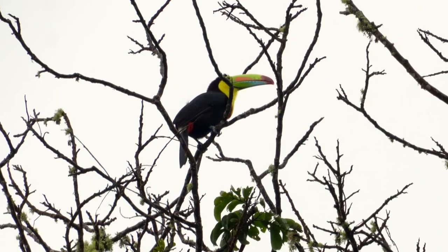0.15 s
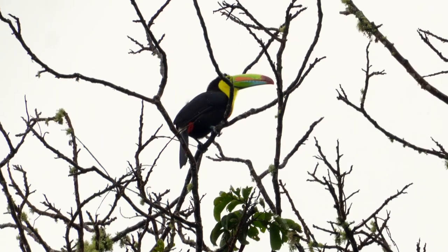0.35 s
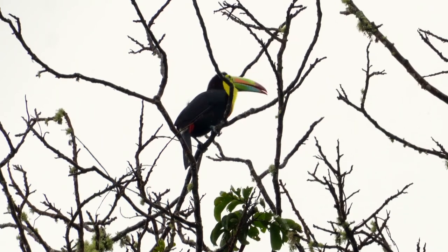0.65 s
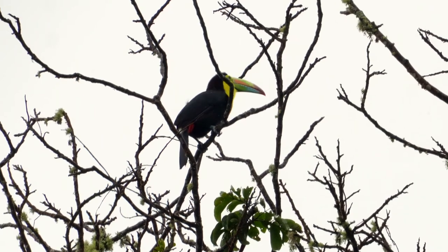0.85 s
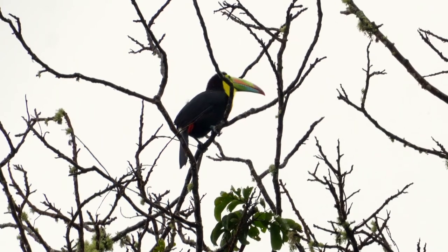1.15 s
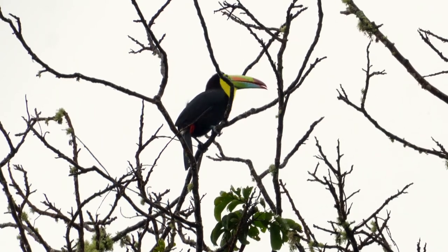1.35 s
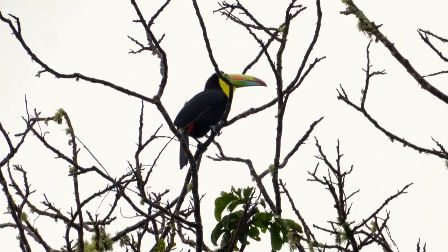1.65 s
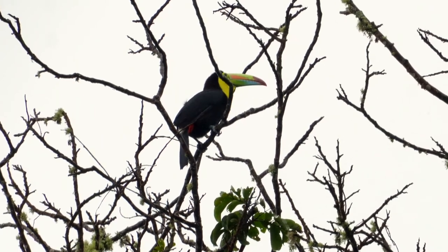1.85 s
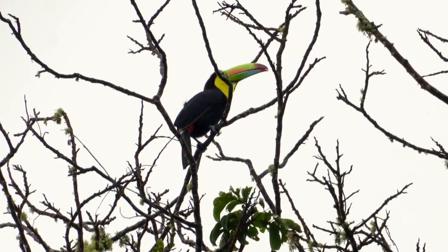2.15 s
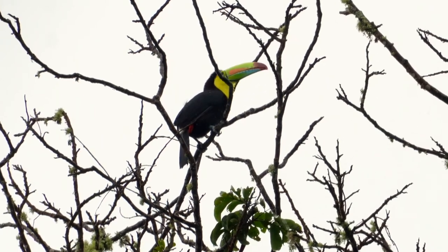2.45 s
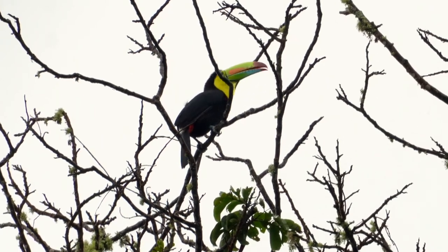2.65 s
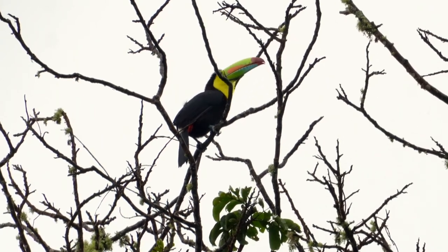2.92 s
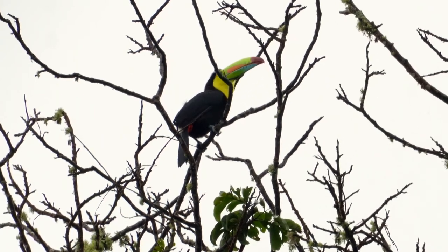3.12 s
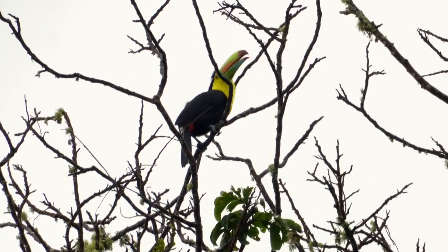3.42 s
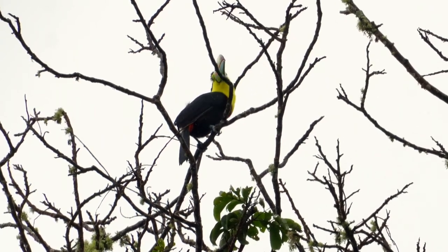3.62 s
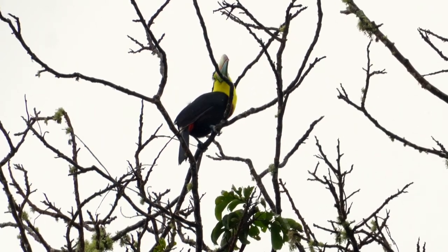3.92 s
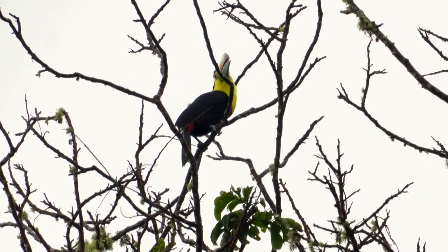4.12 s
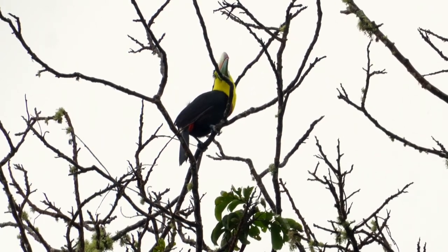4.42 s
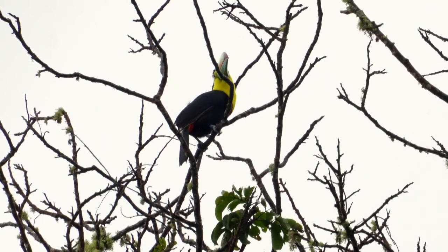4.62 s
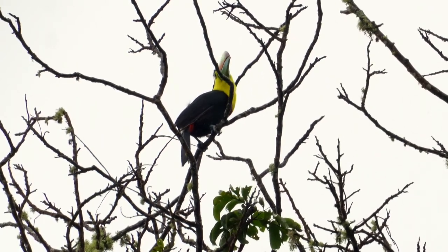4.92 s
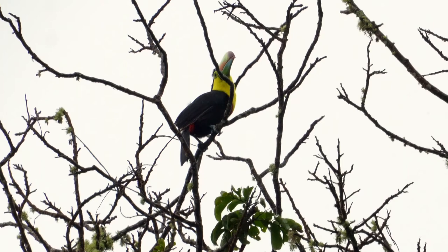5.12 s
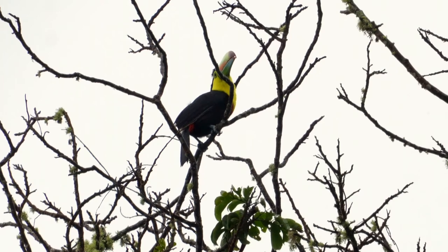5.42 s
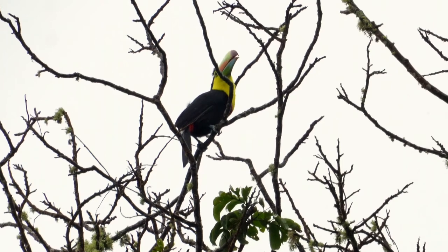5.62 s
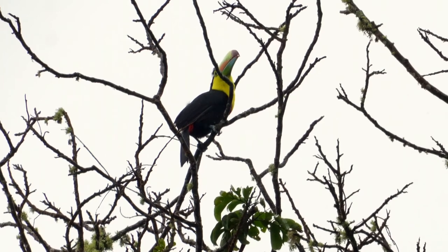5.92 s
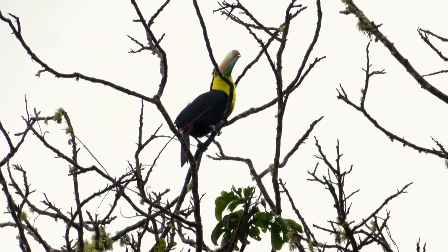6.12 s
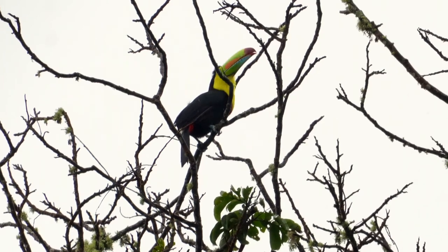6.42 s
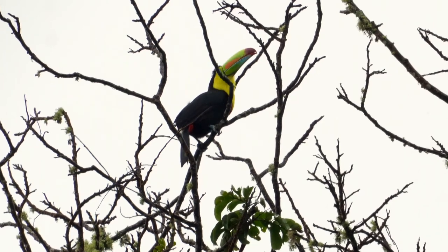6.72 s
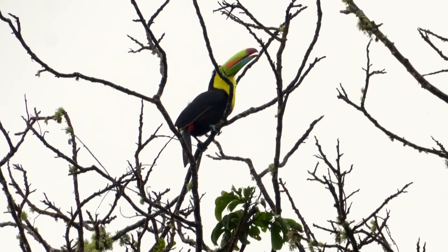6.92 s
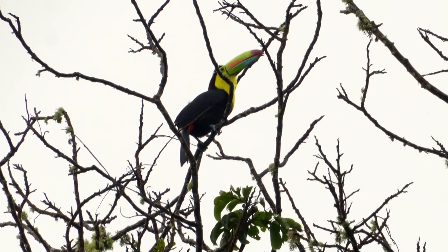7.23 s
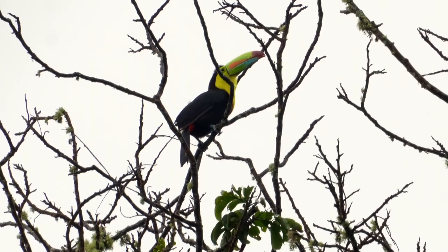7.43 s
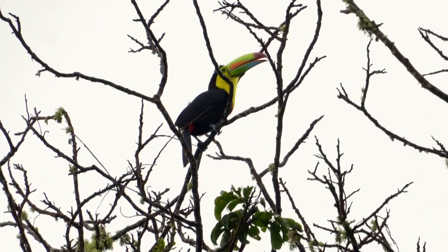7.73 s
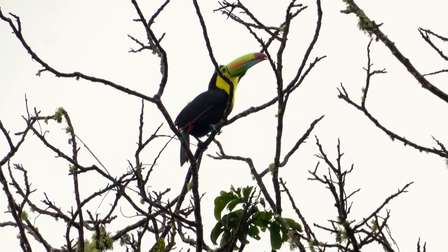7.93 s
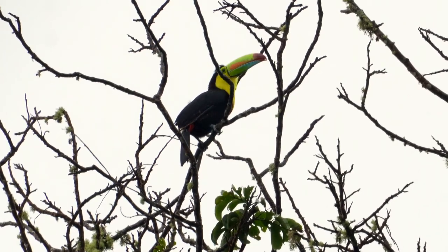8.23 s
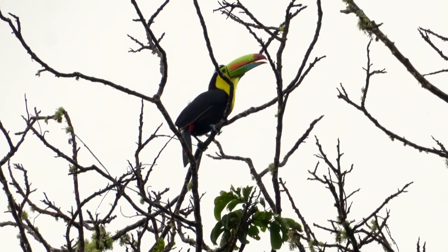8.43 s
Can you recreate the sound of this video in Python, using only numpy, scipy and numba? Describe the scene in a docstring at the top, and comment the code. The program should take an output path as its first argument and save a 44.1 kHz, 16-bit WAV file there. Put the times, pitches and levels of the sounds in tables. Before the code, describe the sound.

Bright, throbbing frog peeps around 4 kHz run about four per second, two voices overlapping at first, one alone in the middle, then two again. Below them a toucan gives regular, grating croaks with a nasal upward bend, loudest at the opening and midway. Flickering rain hiss lies quietly beneath, with crisp leaf drips, brief insect buzzes and muffled rustles. Open wet forest, wide stereo, animals at a distance with short leafy reverberation.

```python
"""A toucan croaks from a far treetop in a wet forest: uneven pulses ring two rising resonances.
Three small frogs pipe rising, throbbing notes, one of them fainter; trunks and leaves echo every caller.
Drops from the canopy burst on leaves as short sprays of band-limited noise, over a soft, flickering rain hiss.
Now and then an insect buzzes (noise in a sliding resonance) or a dull thud or rustle swells up."""
import sys
import numpy as np
from scipy import signal
from scipy.fft import rfft, irfft
from scipy.io import wavfile
from scipy.ndimage import uniform_filter1d
from numba import njit

SR = 44100
rng = np.random.default_rng(int(sys.argv[2]) if len(sys.argv) > 2 else 0)


def persist_wave(psi):
    """Save psi, clipped to +-1, as 16-bit WAV."""
    counts = np.round(np.clip(psi, -1, 1) * 32767).astype(np.int16)
    wavfile.write(sys.argv[1], SR, np.atleast_2d(counts).T)


N = 377496  # length in samples

# rain colour: f/Hz, level per Hz/dB
RAIN_COLOUR = [(20, -40), (60, -35), (115, -23.5), (166, -16.5), (400, -4), (660, 1.5), (1500, 0.5),
               (3600, -8), (6400, -11.5), (11600, -21), (16000, -26)]
# how wide the rain spreads: f/Hz, side minus mid/dB
RAIN_SPREAD = [(30, -3), (85, -12), (125, -33), (300, -14.5), (700, -8), (2000, 0.5), (8000, 0)]
RAIN_DB = -42

# notes of each frog: t/s, level/dB, starting f/Hz before its waver
LOW_FROG_NOTES = [(.0376, -14, 4023), (.27, -15.5, 4055), (.513, -14, 4034), (.7465, -11.5, 4056),
                  (.985, -14, 4020), (1.2254, -13.5, 4035), (1.459, -15.5, 4026), (1.7637, -17.5, 4064),
                  (2.068, -18, 3995), (2.306, -16, 3984), (2.5533, -14.5, 4035), (2.792, -14.5, 4044),
                  (3.044, -13, 4007), (3.289, -14.5, 4040), (3.548, -12, 4022), (3.788, -12.5, 4016),
                  (4.0495, -13.5, 4037), (4.304, -15.5, 4035), (4.5467, -12.5, 4033), (4.797, -14.5, 4022),
                  (5.122, -12, 4025), (5.4375, -13.5, 4008), (5.782, -14.5, 4023), (6.132, -17, 3975),
                  (6.509, -12, 3960)]
HIGH_FROG_NOTES = [(.078, -10, 4230), (.313, -7.5, 4196), (.557, -6, 4184), (.822, -11.5, 4194),
                   (1.068, -13, 4270), (1.2986, -13, 4220), (1.659, -12, 4330), (1.968, -14.5, 4270),
                   (2.283, -10.5, 4195), (6.319, -14.5, 4144), (6.573, -11.5, 4170), (6.791, -12, 4287),
                   (7.0335, -9.5, 4270), (7.2515, -12, 4240), (7.486, -12, 4280), (7.759, -10.5, 4244),
                   (8.0356, -11.5, 4240), (8.257, -12, 4240), (8.4864, -12.5, 4210)]
FAR_FROG_NOTES = [(2.99, -25.5, 3980), (3.659, -26, 3980), (4.998, -33, 3980), (5.345, -30.5, 4060),
                  (5.645, -34.5, 4060), (5.99, -29, 4230), (7.212, -20, 3994), (7.927, -26, 3950)]
# direct sound and echoes of each caller: delay t/s, left level/dB, right level/dB
LOW_FROG_PATHS = [(0, 2, -6), (0.01, -14, -20), (0.017, -6.5, -5), (0.049, -12.5, -27)]
HIGH_FROG_PATHS = [(0, 0, -14), (.009, -11, -16), (.024, -18, -16), (.045, -16, -15), (.062, -22, -20)]
FAR_FROG_PATHS = [(0, -9, -12), (.021, -9, -9)]
TOUCAN_PATHS = [(0, 0, 0), (.008, -5, -4), (.021, -7, -6)]
LOW_TAIL_DB, HIGH_TAIL_DB, FAR_TAIL_DB, TOUCAN_TAIL_DB = -3, -13, .27, -0.5  # leaf scatter
EAR_LAG = 4  # samples

# drops bursting on leaves: t/s, level/dB, main band f/Hz, second band f/Hz, left minus right/dB
LEAF_DROPS = [(0.031, -34.5, 7160, 9400, -12), (0.179, -38, 14700, 5640, -1), (0.497, -27, 14700, 12900, 1),
              (1.153, -33.5, 9700, 14900, 2), (1.468, -29, 11400, 9600, 8), (2.637, -38, 15200, 9100, 1),
              (2.844, -34.5, 14400, 11450, -3), (3.776, -35.5, 9700, 14850, -9),
              (3.899, -37, 11000, 14850, 6), (3.958, -30, 15030, 13300, -1), (4.333, -22, 8700, 10900, 0),
              (4.337, -27, 14600, 12150, 2), (4.472, -30.5, 13400, 15300, 4),
              (5.118, -34.5, 8500, 10900, 3), (5.3137, -24, 7000, 8600, -1), (5.4694, -26, 7220, 11200, -2),
              (5.589, -37.5, 14500, 10700, 8), (5.665, -35, 14500, 13400, -4), (5.783, -30, 9400, 12000, 3),
              (5.839, -39, 15200, 13500, -1.5), (6.0057, -29, 7300, 10950, -12.5),
              (6.264, -27, 10650, 13100, -5), (6.405, -31.5, 14340, 10400, -3.5),
              (6.6149, -14, 5840, 8700, 0), (6.8636, -25, 15100, 9400, 7), (7.468, -28, 13870, 15300, 4),
              (7.918, -26, 5300, 13900, 6.5), (8.198, -41, 14800, 12100, -8)]
SPRAY_RISE_S, SPRAY_FALL_S = .009, 0.14
SPRAY_WIDTH_HZ = 1380  # of each of the three filters in a row

# toucan croaks, two swells each: opening peak t/s, level/dB, wait until main swell t/s, hold t/s,
# level/dB, lower resonance f/Hz, upper resonance f/Hz, width of its first filter f/Hz, left minus right/dB
TOUCAN_CROAKS = [(.088, -27, 0.052, 0.021, -15, 1733, 1798, 74, 0.5),
                 (0.829, -26, 0.043, 0.042, -31, 1636, 1766, 233, 2),
                 (1.545, -36.5, 0.033, 0.043, -32.5, 1636, 1980, 216, 4),
                 (2.225, -39.5, 0.044, 0.046, -34, 1585, 1950, 213, 1),
                 (2.952, -32, 0.023, 0.043, -37, 1654, 2000, 325, 4.5),
                 (3.646, -29.5, 0.013, 0.042, -27.5, 1677, 1887, 240, 7),
                 (4.32, -26, 0.049, 0.022, -18, 1680, 1781, 80.4, 0.5),
                 (5.035, -23.5, 0.031, 0.051, -25, 1640, 1760, 118, 4),
                 (5.74, -27.5, 0.052, 0.033, -23, 1643, 1792, 131, -0.5),
                 (6.46, -36, 0.016, 0.043, -30, 1646, 1890, 242, 0),
                 (7.165, -25.5, 0.019, 0.061, -33.5, 1612, 1970, 317, 4.5),
                 (7.903, -30.5, 0.026, 0.046, -34.5, 1663, 1920, 352, 0)]
# pitches favoured by the long way through the trees: f/Hz, width f/Hz, left level/dB, right level/dB
TREE_RINGS = [(1660, 60, -4, -8), (1724, 40, -1, -7), (1782, 36, 0, 4)]
# overtones of the upper resonance: multiple, level/dB at average resonance width
CROAK_OVERTONES = [(2, -22), (3, -22.5)]
PULSE_HZ = 72.02  # average
OPEN_RISE_DB_S, OPEN_FALL_DB_S, MAIN_RISE_DB_S, MAIN_FALL_DB_S = 381, 341, 1299, 366
LOWER_WIDTH_HZ, SKIRT = 118, 1.52  # first filter's width; second filter's width over the first's
LOWER_CLIMB_HZ_S, CLIMB_PER_S = 900, 6.8  # the upper resonance climbs in widths per second
CLIMB_SPAN_S = 0.067  # both resonances climb this long before and after their middle
CROAK_PLAIN_DB = -2  # croak without the tree rings

# dull thuds and rustles: t/s, level/dB, base f/Hz, base length t/s
DULL_THUDS = [(0.323, -34, 558, 0.093), (0.578, -40.5, 585, 0.051), (1.024, -40, 900, 0.04),
              (1.836, -38.5, 670, 0.051), (2.498, -49.5, 192, 0.082), (2.851, -37, 980, 0.053),
              (3.45, -38.5, 1370, 0.064), (3.462, -39, 2380, 0.036), (4.401, -35.5, 680, 0.045),
              (5.191, -35, 1160, 0.11), (5.747, -37, 900, 0.043), (6.599, -38.5, 700, 0.056),
              (7.918, -33, 3600, 0.014)]
THUD_DIP, THUD_SIDE_DB = 0.57, -11  # depth of the colour dip as a share of the base frequency

# insect buzzes: t/s, base length t/s, level/dB, first f/Hz, last f/Hz, left minus right/dB
INSECT_BUZZES = [(2.179, 0.11, -28, 8440, 8820, -1), (4.384, 0.063, -34.5, 7340, 7100, 11),
                 (6.837, 0.083, -27, 7460, 8290, 4)]

TOP_HZ = 16100


def undb(db):
    """Turn decibels into a plain gain."""
    return 10 ** (np.asarray(db) / 20)


def colour(x, points):
    """Filter by (Hz, dB) points joined on a log-frequency axis."""
    hz, db = np.transpose(points)
    f = np.maximum(np.fft.rfftfreq(x.shape[-1], 1 / SR), 1)
    gain = undb(np.interp(np.log(f), np.log(hz), db))
    return irfft(rfft(x) * gain, x.shape[-1])


def unit(x):
    """Scale to an average (RMS) level of 1."""
    return x / np.sqrt(np.mean(x ** 2))


def add(out, x, s):
    """Mix x into out from time s on."""
    i = int(s * SR)
    out[..., i:i + x.shape[-1]] += x[..., :N - i]


def ears(x, pan_db):
    """Place a sound by making one ear louder than the other."""
    return x * undb(np.array([[pan_db], [-pan_db]]) / 2)


def band(x, hz, octaves):
    """Let one band through with a gentle two-pole filter."""
    low = hz * 2. ** (-octaves / 2)
    high = min(hz * 2. ** (octaves / 2), .45 * SR)
    return signal.sosfilt(signal.butter(1, (low, high), "band", fs=SR, output="sos"), x)


def walk(rate):
    """Wander between random levels, each held 1 / rate s and smoothed twice; spread near 1."""
    k = int(SR / rate)
    steps = np.repeat(rng.standard_normal(N // k + 1), k)
    return 1.3 * uniform_filter1d(uniform_filter1d(steps, k), k)[:N]


@njit
def resonate(x, hz, width):
    """State-variable band-pass whose centre and width can move every sample."""
    y, b, l = np.empty(len(x)), 0., 0.
    for i in range(len(x)):
        g, k = np.tan(np.pi * hz[i] / SR), width[i] / hz[i]
        v = (b + g * (x[i] - l)) / (1 + g * (g + k))
        b, l, y[i] = 2 * v - b, l + 2 * g * v, k * v
    return y


def forest(x, paths, tail_db, t60, lag):
    """A few strong echoes off trunks, and a dense scatter off leaves, unrelated at the two ears."""
    t = np.arange(SR // 2) / SR
    # the scatter holds while near trees answer, then dies quickly: 60 dB down at t60 seconds
    fade = (1 - np.exp(-t / .008)) * undb(-60 * (t / t60) ** 1.4)
    scatter = rng.standard_normal((2, len(t))) * fade
    response = undb(tail_db) * scatter / np.sqrt(np.sum(scatter ** 2, axis=1, keepdims=True))
    for s, left_db, right_db in paths:
        i = int(round(max(s, 0) * SR))
        response[0, i] += undb(left_db)
        response[1, i or lag] += undb(right_db)  # direct sound reaches the right ear lag samples late
    return signal.fftconvolve(x[None], response, axes=1)[:, :N]


def rain():
    """Far rain blurs into a hiss; its bands swell together while each flickers on its own."""
    spectrum = rfft(rng.standard_normal((2, N)))
    octave = np.log2(np.maximum(np.fft.rfftfreq(N, 1 / SR), 1) / 30)
    swell, hiss = walk(2.62), 0
    for k in range(10):
        part = irfft(spectrum * np.sqrt(np.clip(1 - np.abs(octave - k), 0, 1)), N)
        flicker_db = 1.7 + 0.6 * (k < 6) + 2.5 * (k < 3)  # low bands flicker most
        hiss = hiss + part * undb(0.5 * swell + flicker_db * walk(7))
    mid, side = colour(hiss, RAIN_COLOUR)
    side = colour(side, RAIN_SPREAD)
    return undb(RAIN_DB) * np.array([mid + side, mid - side]) / np.std(mid)


def frog(notes, lead, length, rise_hz, fade_db, throb_hz, throb, steep, rough_db):
    """Each note swells in over the lead time, then throbs and fades as it slides up, each a bit differently."""
    out, t = np.zeros(N), np.arange(int(length * SR)) / SR
    after = np.maximum(t - lead, 0)
    shape = np.minimum(t / lead, 1) ** steep * np.minimum((length - t) / .01, 1) ** 2
    shape *= undb(fade_db * after / length)
    waver = 1 + .009 * walk(260)
    chances = rng.standard_normal((len(notes), 2))
    for (s, db, hz), (slide, pace) in zip(notes, chances):
        pitch = hz + (1 + 0.1064 * slide) * rise_hz * t / length
        pitch *= np.resize(waver[int(s * SR) - len(t) // 2:], len(t))
        tone = np.sin(2 * np.pi * np.cumsum(pitch) / SR)
        beat = 1 - throb * np.sin(np.pi * throb_hz * (1 + 0.23 * pace) * after) ** 2
        add(out, undb(db) * shape * beat * tone, s - lead)
    return out * undb(rough_db * walk(160))  # an uneven rasp


def frogs():
    """Three frogs, each with its own voice and its own echo paths."""
    low = frog(LOW_FROG_NOTES, lead=0.015, length=.085, rise_hz=500, fade_db=-11,
               throb_hz=86.7, throb=0.54, steep=2.13, rough_db=3.77)
    high = frog(HIGH_FROG_NOTES, lead=.028, length=0.058, rise_hz=633, fade_db=-35.5,
                throb_hz=114, throb=0.58, steep=4.7, rough_db=2.5)
    far = frog(FAR_FROG_NOTES, lead=.03, length=0.085, rise_hz=521, fade_db=-20.5,
               throb_hz=65, throb=0.75, steep=1.48, rough_db=6.8)
    return (forest(low, LOW_FROG_PATHS, LOW_TAIL_DB, t60=0.17, lag=EAR_LAG)
            + forest(high, HIGH_FROG_PATHS, HIGH_TAIL_DB, t60=0.27, lag=EAR_LAG)
            + forest(far, FAR_FROG_PATHS, FAR_TAIL_DB, t60=0.14, lag=0))


def splash(out, s, db, hz, second_hz, pan_db):
    """One drop: a faint tick, and spray in two narrow bands and a weaker chance band."""
    t = np.arange(SR // 6) / SR
    # droplets of unequal size make the spray crackle
    crackle_db = np.minimum(5.0 * rng.exponential(size=(3, 1, len(t))), 16)
    noise = rng.standard_normal((3, 2, len(t))) * undb(crackle_db)
    centres = [hz, second_hz, rng.uniform(6070, 15100)]
    fall_db = 60 * rng.uniform(0.73, 0.84)  # lost in every SPRAY_FALL_S
    spray = 0
    for n, f, level_db in zip(noise, centres, (0, -5, -11)):
        octaves = 1.44 * SPRAY_WIDTH_HZ / f  # width in Hz turned into octaves
        narrow = band(band(band(n, f, octaves), f, octaves), f, octaves)
        spray = spray + undb(level_db) * unit(narrow)
    rise = np.minimum(t / SPRAY_RISE_S, 1) * (1 + 2 * np.exp(-t / SPRAY_RISE_S)) / 2
    spray = spray * rise * undb(-fall_db * t / SPRAY_FALL_S)
    tick = .08 * band(noise[0, 0], hz, 1.2) * np.exp(-t / .003)
    add(out, ears(undb(db) * (spray + tick), pan_db), s)


def drops():
    """The listed drops, and fifty faint ones at chance moments all around."""
    out = np.zeros((2, N))
    for row in LEAF_DROPS:
        splash(out, *row)
    for s, size, pitch, second, side in rng.random((50, 5)):
        splash(out, s * N / SR, -52 + 9 * size, 8000 + 7000 * pitch, 8000 + 7000 * second, 14 * (side - .5))
    return out


def surge(t, db, rise, fall):
    """Gain of a swell that climbs to its peak at t = 0 and dies away, both in dB per second."""
    return undb(db + rise * np.minimum(t, 0) - fall * np.maximum(t, 0))


def toucan():
    """Uneven pulses of the syrinx ring a lower, then an upper resonance that climbs as the bill opens."""
    t = np.arange(N) / SR
    gaps = (1 + .1 * rng.standard_normal(N // 200)) / PULSE_HZ
    at = (np.cumsum(gaps) * SR).astype(int)
    pulses = 0.062 * rng.standard_normal(N)  # breathy rasp between the pulses
    pulses[at[at < N]] += undb(1.5 * rng.standard_normal(len(at)))[at < N]

    lower, upper, broad, pan_db = np.ones((4, N))
    opening = main = 0
    for k, croak in enumerate(TOUCAN_CROAKS):
        open_s, open_db, later_s, hold_s, main_db, open_hz, main_hz, width_hz, turn_db = croak
        early, late = t - open_s, t - open_s - later_s
        since = (t > open_s - .2) | (k == 0)  # each croak takes over just before it opens
        lower_climb = np.clip(early[since], -CLIMB_SPAN_S, CLIMB_SPAN_S)
        lower[since] = open_hz + LOWER_CLIMB_HZ_S * lower_climb
        # a wide-open bill, with its broad resonance, climbs fastest
        upper_climb = np.clip(late[since] - hold_s / 2, -CLIMB_SPAN_S, CLIMB_SPAN_S)
        upper[since] = main_hz + CLIMB_PER_S * width_hz * upper_climb
        broad[since], pan_db[since] = width_hz, turn_db
        after = late - np.clip(late, 0, hold_s)  # stands still while the main swell holds
        swell = surge(early, open_db, OPEN_RISE_DB_S, OPEN_FALL_DB_S)
        opening = opening + swell * surge(after, 0, 0, MAIN_FALL_DB_S)
        main = main + surge(after, main_db, MAIN_RISE_DB_S, MAIN_FALL_DB_S)

    voice = 0
    lower_width = np.full(N, 1. * LOWER_WIDTH_HZ)
    for hz, width, effort in (lower, lower_width, opening), (upper, broad, main):
        hz = hz * (1 + .012 * walk(70))  # the pitch wavers
        ring = resonate(resonate(pulses, hz, width), hz, SKIRT * width) / np.sqrt(width)
        voice = voice + unit(ring) * uniform_filter1d(effort, 200)
    for multiple, db in CROAK_OVERTONES:
        hz, width = multiple * upper, multiple * broad
        ring = unit(resonate(resonate(pulses, hz, width), hz, width))
        # broader croaks have stronger overtones
        voice = voice + undb(db) * ring * uniform_filter1d(main, 200) * broad / broad.mean()
    voice = voice * undb(2.23 * walk(60))  # the breath comes unevenly

    heard = forest(voice, TOUCAN_PATHS, TOUCAN_TAIL_DB, t60=0.18, lag=0)
    ringing = 0
    for hz, width, left_db, right_db in TREE_RINGS:
        ring = np.array([resonate(ear, np.full(N, 1. * hz), np.full(N, 1. * width)) for ear in heard])
        ringing = ringing + undb([[left_db], [right_db]]) * ring
    return (undb(CROAK_PLAIN_DB) * heard + ringing) * undb(np.array([pan_db, -pan_db]) / 2)


def thuds():
    """Soft swells of noise whose colour dips and comes back up."""
    out = np.zeros((2, N))
    for s, db, hz, length in DULL_THUDS:
        n = int(1.324 * length * SR)
        # 1.5 times the base frequency at both ends, 0.93 times in the middle
        centre = hz * (0.93 + THUD_DIP * np.linspace(-1, 1, n) ** 2)
        layers = []
        for x in rng.standard_normal((2, n)):
            for _ in range(3):
                x = resonate(x, centre, centre)
            layers.append(unit(x))
        mid, side = layers
        stereo = mid + undb(THUD_SIDE_DB) * side * np.array([[1], [-1]])
        add(out, undb(db) * np.sqrt(np.hanning(n)) * stereo, s)
    return out


def insects():
    """Noise, like dense scraping clicks, rings a narrow wing resonance that slides in pitch."""
    out = np.zeros((2, N))
    for s, length, db, first_hz, last_hz, pan_db in INSECT_BUZZES:
        t = np.arange(int(2 * length * SR)) / SR
        hz = first_hz + (last_hz - first_hz) * np.minimum(t / (0.5 * length), 1)
        width = np.full(len(t), 500.0)
        buzz = []
        for _ in range(2):  # one per ear
            noise = rng.standard_normal(len(t))
            buzz.append(unit(resonate(resonate(noise, hz, width), hz, width)))
        shape = np.minimum(t / (0.18 * length), 1) * undb(-30 * np.maximum(t / length - .65, 0))
        add(out, ears(undb(db) * shape * np.array(buzz), pan_db), s)
    return out


def scene():
    """Add up everything heard in the forest."""
    return rain() + frogs() + drops() + toucan() + thuds() + insects()


def record(dry):
    """A steep low-pass cuts off the very top of the treble."""
    return signal.sosfilt(signal.ellip(10, .2, 80, TOP_HZ, fs=SR, output="sos"), dry)


dry = scene()
out = record(dry)
persist_wave(out)
```